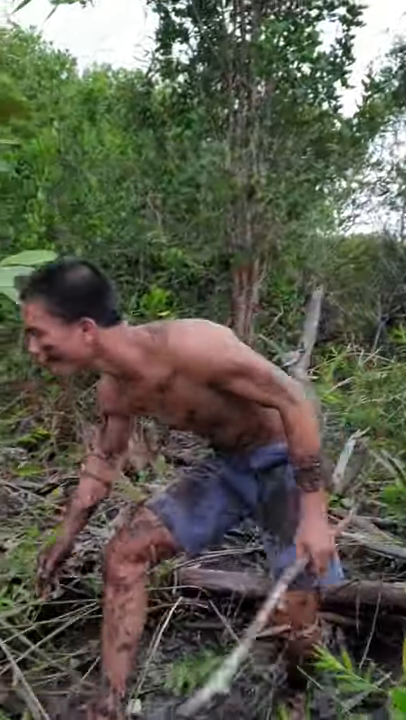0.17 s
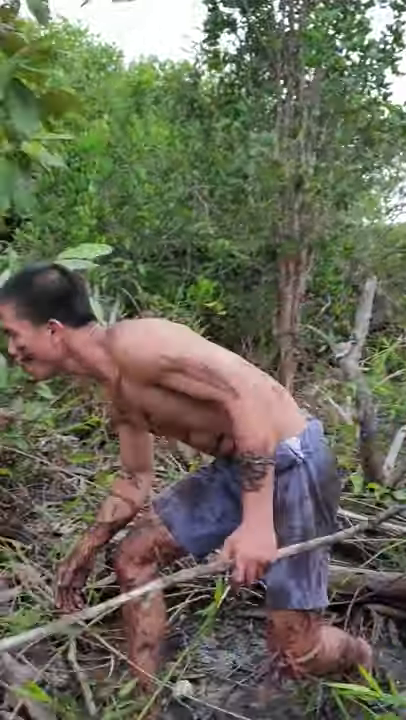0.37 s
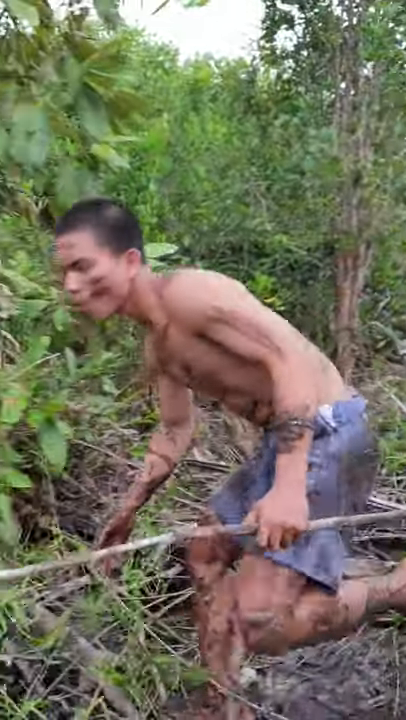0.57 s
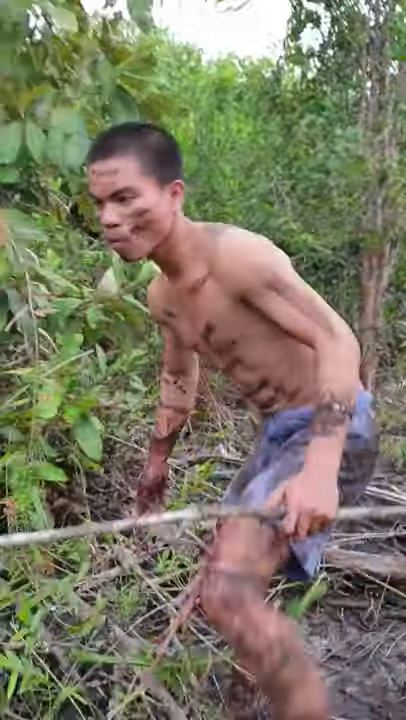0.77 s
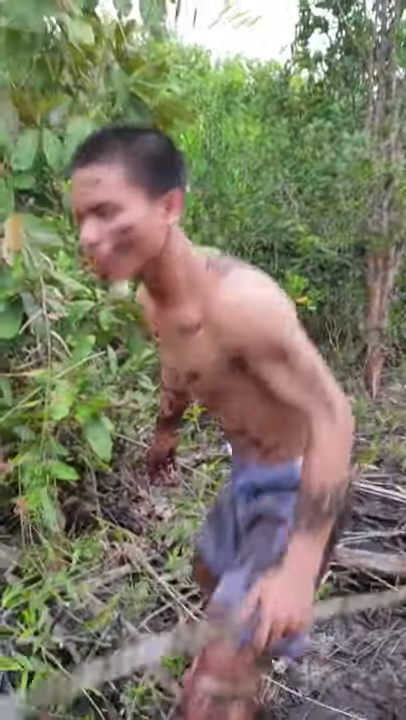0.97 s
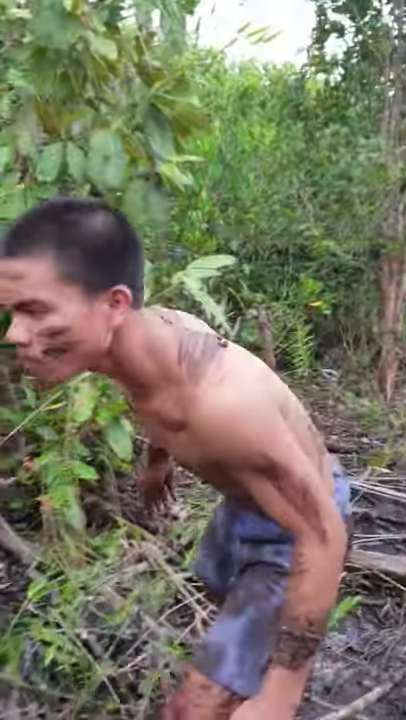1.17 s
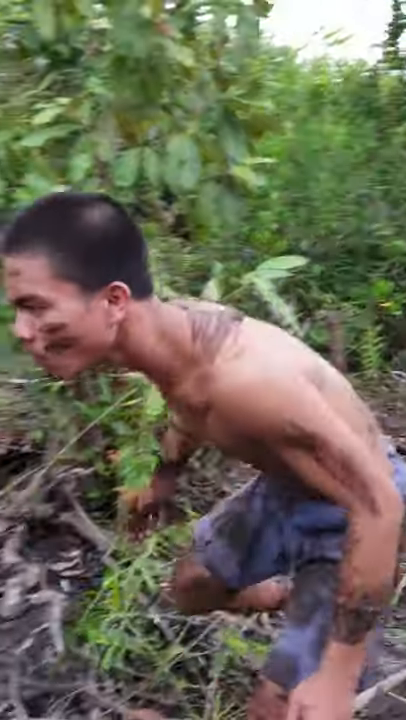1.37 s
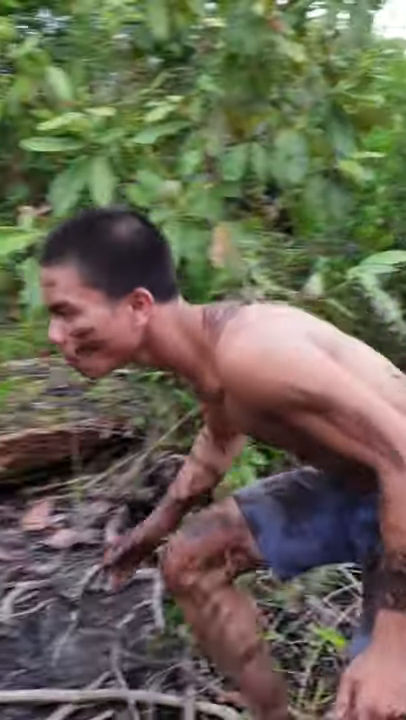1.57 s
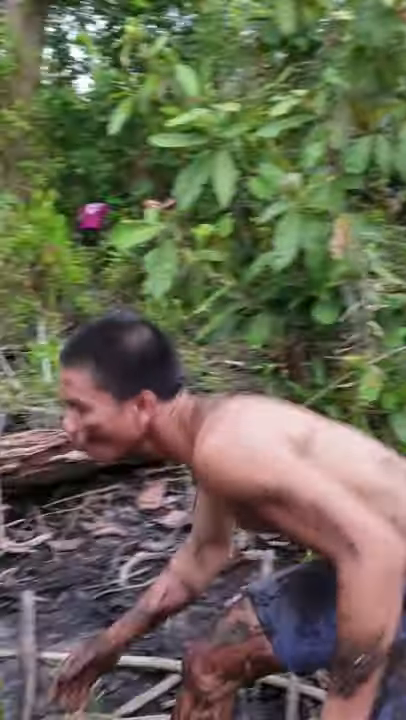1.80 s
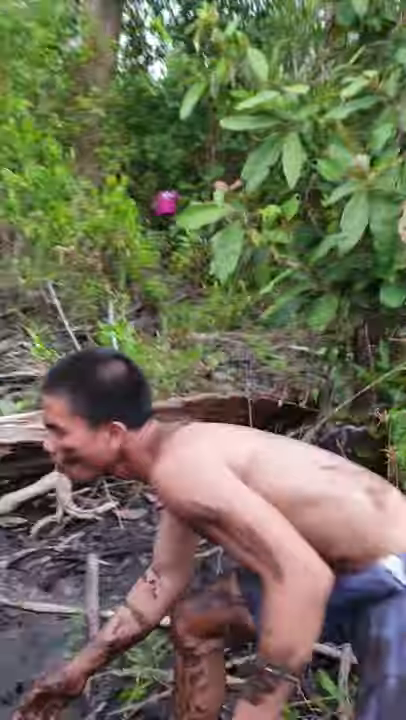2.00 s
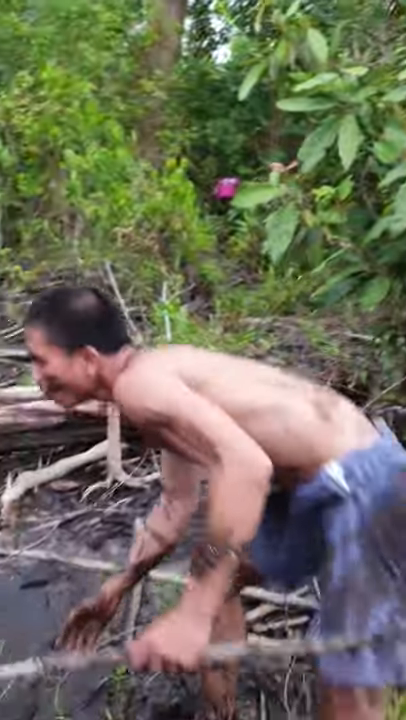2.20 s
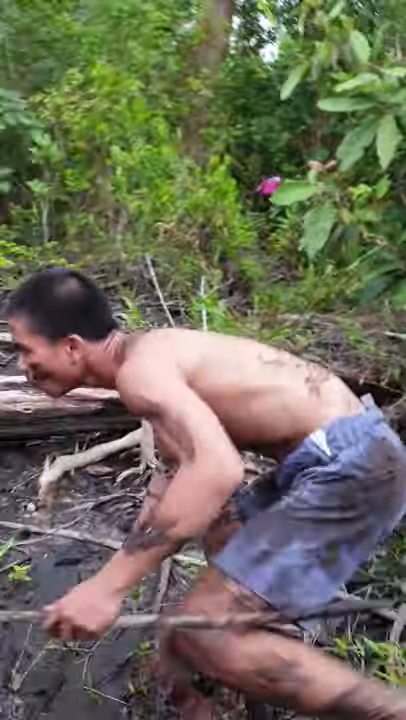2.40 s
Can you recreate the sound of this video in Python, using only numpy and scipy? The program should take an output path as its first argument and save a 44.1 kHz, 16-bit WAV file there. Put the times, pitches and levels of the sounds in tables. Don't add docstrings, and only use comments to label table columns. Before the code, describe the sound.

Someone creeps over dry debris: bright snaps and crackling leaves, a second strong burst around one second, then sparse ticks and a softer crunch; faint breeze rumble and leaf hiss, recorded close in open woodland.

```python
import sys
import numpy as np
from scipy import signal
from scipy.fft import rfft, irfft
from scipy.io import wavfile
from scipy.ndimage import uniform_filter1d

SR = 44100
rng = np.random.default_rng(int(sys.argv[2]) if len(sys.argv) > 2 else 0)


def to_wav(s):
    ch = np.atleast_2d(s).T
    pcm = np.round(np.clip(ch, -1, 1) * 32767)
    wavfile.write(sys.argv[1], SR, pcm.astype(np.int16))


def rack_gain(trim_db):
    fader = np.asarray(trim_db, float)
    return 10 ** (fader / 20)


N = 108045


def rms_one(x):
    return x / np.sqrt(np.mean(x ** 2) + 1e-20)


def in_time(rows):
    seconds, *columns = np.transpose(rows)
    return [np.interp(np.arange(N) / SR, seconds, column) for column in columns]


def at_hz(points, hz):
    point_hz, value = np.array(points).T
    return np.interp(np.log(hz + 1), np.log(point_hz), value)


def colour(x, points):
    gain = rack_gain(at_hz(points, np.fft.rfftfreq(N, 1 / SR)))
    return rms_one(irfft(rfft(x) * gain, N))


def band(x, low_hz, high_hz):
    return signal.sosfilt(signal.butter(2, [low_hz, high_hz], "band", fs=SR, output="sos"), x)


def drift(rate_hz):
    r = np.exp(-2 * np.pi * rate_hz / SR)
    noise = rng.standard_normal(N + SR)
    return rms_one(signal.lfilter([1], [1, -2 * r, r * r], noise)[SR:])


def ring(clicks, hz, t60):
    r, w = rack_gain(-60 / (t60 * SR)), 2 * np.pi * hz / SR
    return signal.lfilter([0, np.sin(w)], [1, -2 * r * np.cos(w), r * r], clicks + 1e-18)


def grains(per_second, spread_db, size):
    born = rng.random(size) < per_second / SR
    height = rack_gain(spread_db * np.minimum(rng.exponential(1, size), 4))
    return born * height * rng.choice([-1, 1], size)


def rumble_and_mud():
    # time in seconds, rumble level in dB, mud level relative to the rumble in dB.
    rumble_path = [(0, -55.5, -25), (.16, -55.5, -22), (.24, -45, -6), (.36, -58.5, -17), (.43, -47, -12),
                   (.5, -54.5, -12), (.78, -63, -12), (.9, -61.5, -7), (.98, -48.5, -10.5),
                   (1.07, -59, -10.5), (1.3, -54, -8), (1.55, -60.5, -6.5), (1.77, -56.5, -23),
                   (1.81, -50.5, -7.5), (1.9, -59.5, -5.5), (2.15, -63, -7.5), (2.31, -53, -22),
                   (2.45, -60.5, -8)]
    # frequency in Hz, rumble strength in dB per Hz.
    rumble_spectrum = [(15, -32.5), (25, -21), (59, -3.5), (89, -2), (136, -5.5), (300, -17.5), (390, -41),
                       (660, -120)]
    lumps_db = 2.8
    rumble_db, mud_db = in_time(rumble_path)
    rumble = colour(rng.standard_normal(N), rumble_spectrum)
    mud = rms_one(band(rng.standard_normal(N), 170, 634))
    rumble_level = rack_gain(rumble_db + lumps_db * drift(12))
    mud_level = rack_gain(rumble_db + mud_db + lumps_db * drift(25))
    return rumble_level * rumble + mud_level * mud


def far_leaves():
    # frequency in Hz, hiss strength in dB per Hz.
    leaf_spectrum = [(180, -30), (320, -10.5), (800, -5.5), (1500, -8), (2600, -2.5), (3400, -17.5),
                     (4900, -25), (6100, -13), (11700, -10.5), (14400, -11)][1:9]
    level_db, patch_db = -66.5, 2.2
    edges = np.geomspace(250, 16000, 7)
    hiss = np.zeros(N)
    for low_hz, high_hz in zip(edges, edges[1:]):
        hiss += rack_gain(patch_db * drift(5)) * band(rng.standard_normal(N), low_hz, high_hz)
    return rack_gain(level_db) * colour(hiss, leaf_spectrum)


def insect():
    # time in seconds, pitch in Hz, level in dB.
    whistle_path = [(1.37, 12300, -90), (1.4, 13050, -72), (1.425, 13550, -67), (1.46, 12600, -72),
                    (1.5, 13450, -69), (1.55, 12400, -72), (1.6, 11800, -78), (1.67, 11000, -76),
                    (1.72, 12300, -80)]
    hz, db = (uniform_filter1d(curve, size=500) for curve in in_time(whistle_path))
    return rack_gain(db + 2.5 * drift(40)) * np.sin(2 * np.pi * np.cumsum(hz) / SR)


def litter():
    # time in seconds, foot pressure as a level in dB, boost of the coarse bark below 5 kHz in dB.
    foot_pressure = [(0, -66, -7.5), (.13, -71, -5), (.19, -64.5, 11), (.33, -52.5, -1), (.345, -45.5, 1),
                     (.5, -54.5, -1), (.7, -59.5, -1), (.87, -67.5, -4.5), (.95, -50.5, 5.5),
                     (1.25, -63, 4.5), (1.3, -60, 0.5), (1.45, -81.5, 2), (1.775, -69.5, -28),
                     (1.795, -50.5, 0), (1.95, -55.5, 4), (2.2, -74, -1.5), (2.245, -64.5, 9.5),
                     (2.3, -61.5, -18)]
    # frequency in Hz, litter strength in dB per Hz.
    litter_spectrum = [(180, -31), (300, -1), (472, -37), (537, -8.5), (1930, -2), (2460, 0.5),
                       (7660, -2.5), (11900, 0), (14400, -6)]
    grains_per_s, grain_spread_db, hiss_share = 1200, 3, 1.3
    level_db, flicker_db, patch_db = 8, 1.8, 1.5
    tread_db, coarse_db = in_time(foot_pressure)

    bits = rms_one(grains(grains_per_s * rack_gain(4.4 * drift(25)), grain_spread_db, size=N))
    dealt = rng.integers(0, 8, N)
    edges = np.geomspace(300, 16000, 9)
    crackle = np.zeros(N)
    for k in range(8):
        rough = bits * (dealt == k) * np.sqrt(8) + hiss_share * rng.standard_normal(N)
        crackle += rack_gain(patch_db * drift(16)) * band(rough, edges[k], edges[k + 1])
    crackle = colour(crackle, litter_spectrum)

    coarse = signal.sosfiltfilt(signal.butter(2, 5000, fs=SR, output="sos"), crackle)
    pressure = rack_gain(tread_db + level_db + flicker_db * drift(30))
    return pressure * (crackle + coarse * (rack_gain(coarse_db) - 1))


def ticks():
    # start in seconds, peak level in dB, centre of the click's range in Hz.
    fibre_ticks = [(0.142, -45.5, 2350), (0.2384, -55, 4710), (0.3353, -49, 11200), (0.3624, -39, 6900),
                   (0.3772, -28.5, 5880), (0.4544, -23.5, 11500), (0.614, -48, 6540), (0.6264, -49.5, 3360),
                   (0.6617, -42.5, 12100), (0.8468, -46.5, 11500), (0.8776, -42.5, 11900),
                   (0.9218, -47, 11400), (1.1508, -36.5, 11100), (1.1867, -42, 12000), (1.212, -44, 11200),
                   (1.294, -38.5, 2220), (1.3054, -51, 3850), (1.4172, -51.5, 13700),
                   (1.4476, -49.5, 12020), (1.5529, -56, 11980), (1.6146, -49, 11800),
                   (1.6416, -52.5, 12000), (1.8896, -34, 12000), (2.0748, -42, 12860),
                   (2.1437, -39.5, 11200), (2.2895, -55, 11260), (2.3106, -44, 12300),
                   (2.3614, -44.5, 11600), (2.396, -44, 11800), (2.4198, -38, 13300)]
    level_db, fall_s = 7, .0014
    span = 1.5
    out, t = np.zeros(N + SR), np.arange(600) / SR
    burst = np.minimum(t / .0005, 1) * np.exp(-t / fall_s)
    for start_s, db, hz in fibre_ticks:
        fibres = burst * rng.standard_normal(len(t))
        click = band(fibres, hz / span ** 2, 17000)
        click = band(click, hz / span, min(hz * span, 16000))
        i = int(start_s * SR)
        out[i:i + len(t)] += rack_gain(db + level_db) * click / np.abs(click).max()
    return out[:N]


def knocks():
    # start in seconds, peak level in dB, lowest pitch in Hz.
    stick_knocks = [
        (0.206, -29.5, 1120),
        (0.251, -30.5, 715),
        (0.503, -37.5, 273),
        (0.684, -38.5, 1630),
        (0.952, -29.5, 658),
        (0.981, -23, 692),
        (0.996, -24.5, 675),
        (1.806, -29, 343),
        (1.952, -38, 740),
    ]
    level_db, t60_s = -3, .03
    overtone, overtone_db = 1.72, -4
    out = np.zeros(N)
    for start_s, db, hz in stick_knocks:
        click = np.zeros(N)
        click[int(start_s * SR)] = rack_gain(db + level_db)
        out += ring(click, hz, t60_s)
        out += rack_gain(overtone_db) * ring(click, overtone * hz, t60_s / overtone)
    return out


def snaps():
    # start in seconds, peak level in dB, middle range (1.9-4.6 kHz) in dB, low range in dB.
    twig_snaps = [(0.173, -32.5, -11, -4), (0.207, -6.5, 3, -17.5), (0.2533, -20, 7, 0.5),
                  (0.3416, -12.5, -8.5, -45), (0.414, 0, 0.5, -27.5), (0.5117, -21, -10, -28),
                  (0.9399, -7.5, -5, -21), (0.951, -11, 0.5, -12.5), (0.9771, -1.5, -4.5, -25.5),
                  (1.042, 0.5, -8.5, -28), (1.28, -38, 0, -38), (1.7908, -31.5, -9, -32),
                  (1.8067, -15, -4, -17.5), (1.8167, -47.5, -5, -24.5), (1.8462, -28, 2, -35),
                  (1.9539, -24, -2.5, -7)]
    # time to die by 60 dB in seconds, starting level in dB.
    trunk_echoes = [
        (.055, -22),
        (.2, -33),
    ]
    level_db, rise_s, fall_s, splinters_per_s = -2.5, .0007, .0011, 20000
    own_share = 1.5
    out, t = np.zeros((2, N + SR)), np.arange(SR // 4) / SR
    burst = (1 - np.exp(-t / rise_s)) ** 2 * np.exp(-t / fall_s)
    tail = sum(rack_gain(db - 60 * t / t60) for t60, db in trunk_echoes)
    tail = tail * np.minimum(t / .002, 1)
    for start_s, db, middle_db, low_db in twig_snaps:
        i = int(start_s * SR)
        for low_hz, high_hz, range_db in ((500, 1900, low_db), (1900, 4600, middle_db), (4600, 15500, 0)):
            fibres = burst * grains(splinters_per_s, 2.2, size=len(t))
            shared, *own = rng.standard_normal((3, len(t)))
            scatter = tail * (shared + own_share * np.array(own))
            sound = fibres / np.abs(fibres).max() + scatter
            sound = band(band(sound, low_hz, high_hz), .8 * low_hz, 16000)
            out[:, i:i + len(t)] += rack_gain(db + level_db + range_db) * sound / np.abs(sound).max()
    return out[:, :N]


def scene():
    # frequency in Hz, share of the sound common to both ports (0 to 1).
    port_likeness = [(30, .7), (100, .8), (1000, .6), (4000, .6), (12000, .4)]
    # frequency in Hz, left port relative to the right in dB.
    left_port_tone = [(60, -2), (200, -1.5), (700, 1.5), (2400, 1), (4400, -9), (6000, -15), (9500, -16),
                      (15000, -22)]
    left_lag_s, notch_hz, notch_width_hz, notch_db = .00023, 7900, 850, -26
    hz = np.fft.rfftfreq(N, 1 / SR)
    alike = at_hz(port_likeness, hz)
    common = rfft(litter() + rumble_and_mud() + far_leaves())
    other = rfft(litter() + rumble_and_mud() + far_leaves())
    wide = np.array([alike * common + np.sqrt(1 - alike ** 2) * other, common])
    left, right = wide + rfft(snaps() + ticks() + knocks() + insect())

    shadow_db = at_hz(left_port_tone, hz)
    shadow_db = shadow_db + notch_db * np.exp(-((hz - notch_hz) / notch_width_hz) ** 2)
    delay = np.exp(-2j * np.pi * hz * left_lag_s)
    return np.array([irfft(left * rack_gain(shadow_db) * delay, N), irfft(right, N)])


def low_pass(x):
    return signal.sosfilt(signal.butter(12, 15760, fs=SR, output="sos"), x)


def record(dry):
    # resonance in Hz, width in Hz, boost in dB.
    port_peaks = [
        (6060, 540, 5),
        (9660, 200, 3.5),
        (12000, 1600, 7.5),
    ]
    headroom = 1.3
    hz = np.fft.rfftfreq(N, 1 / SR)
    ports_db = sum(db * np.exp(-((hz - peak_hz) / width_hz) ** 2) for peak_hz, width_hz, db in port_peaks)
    resonant = irfft(rfft(dry) * rack_gain(ports_db), N)
    rounded = headroom * np.tanh(resonant / headroom)
    top_cut = signal.ellip(8, 1, 30, 14650, fs=SR, output="sos")
    mix = signal.sosfilt(top_cut, rounded)
    return low_pass(mix)


dry = scene()
out = record(dry)
to_wav(out)
```